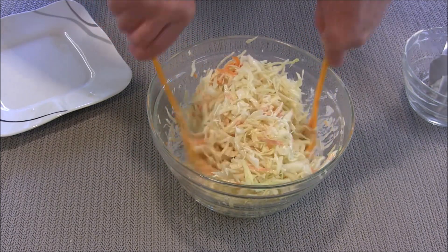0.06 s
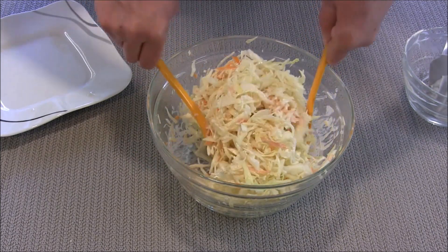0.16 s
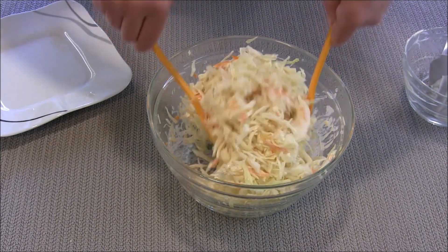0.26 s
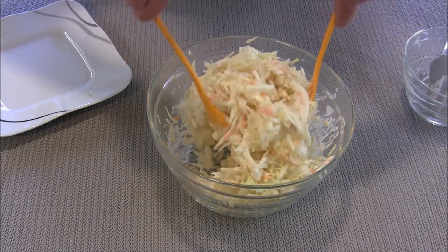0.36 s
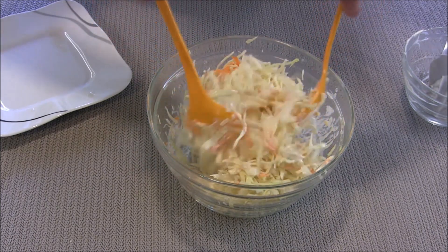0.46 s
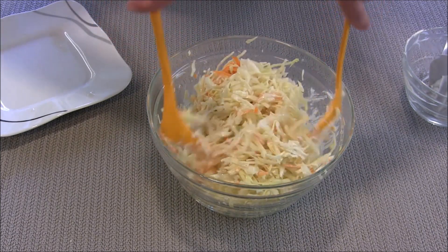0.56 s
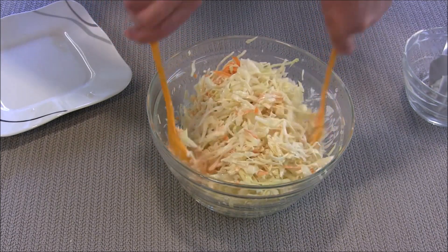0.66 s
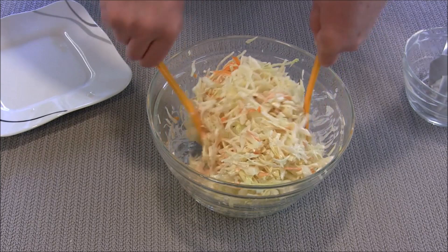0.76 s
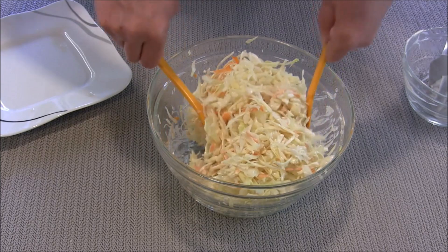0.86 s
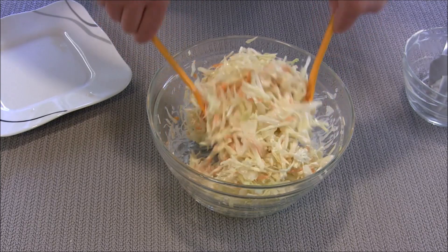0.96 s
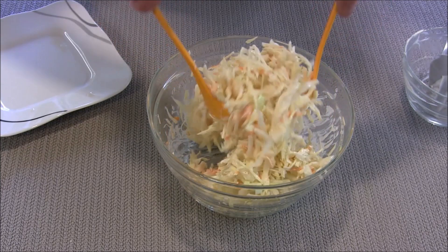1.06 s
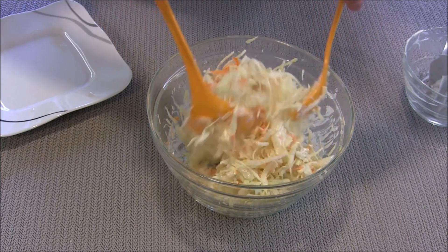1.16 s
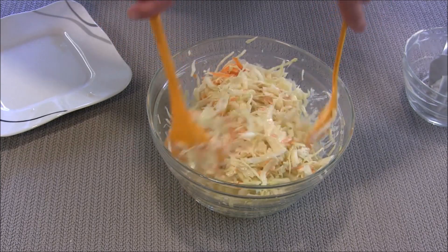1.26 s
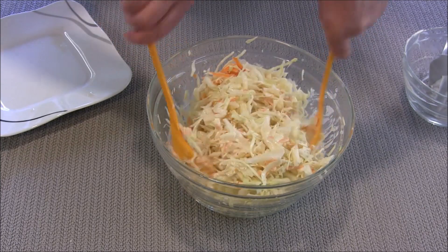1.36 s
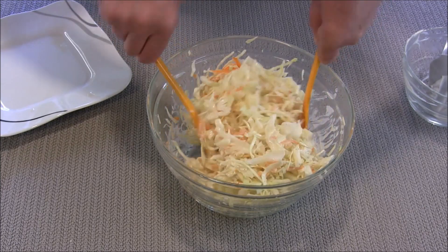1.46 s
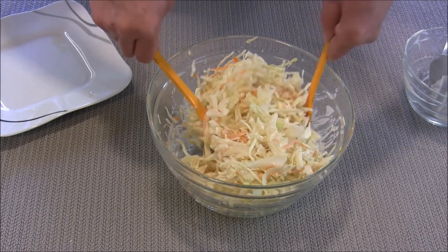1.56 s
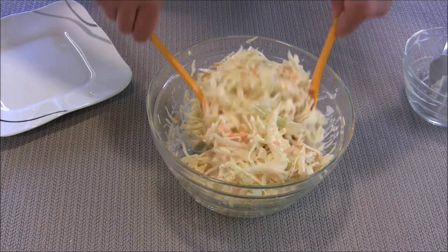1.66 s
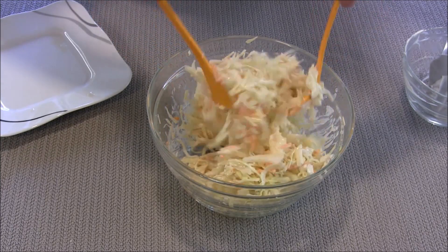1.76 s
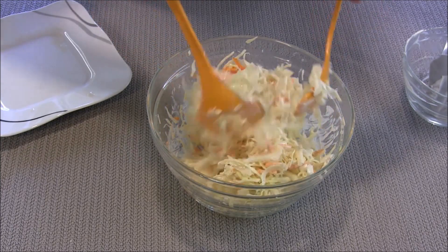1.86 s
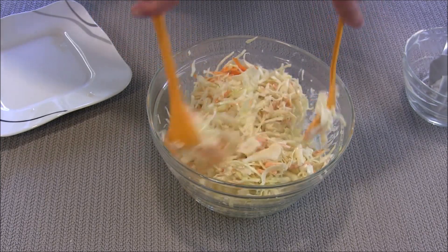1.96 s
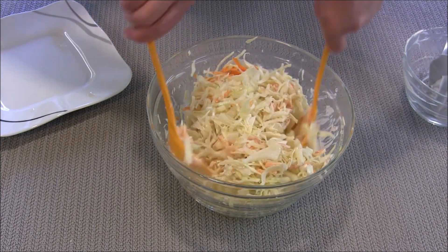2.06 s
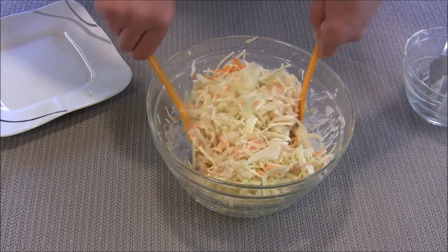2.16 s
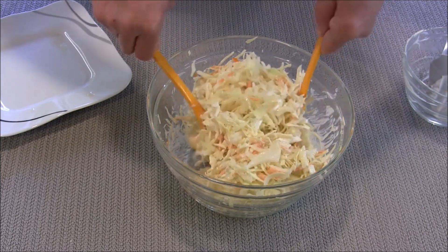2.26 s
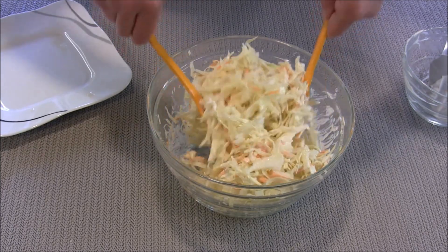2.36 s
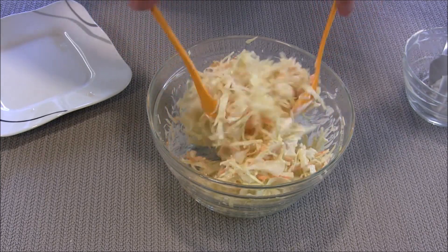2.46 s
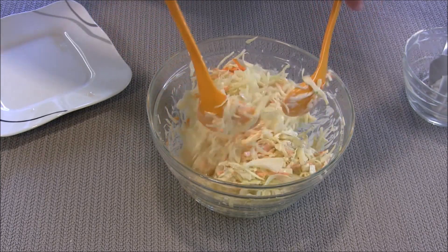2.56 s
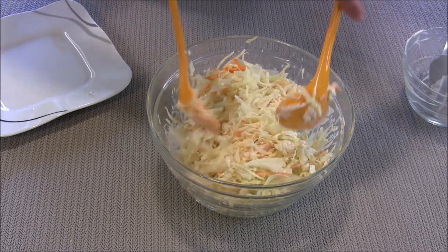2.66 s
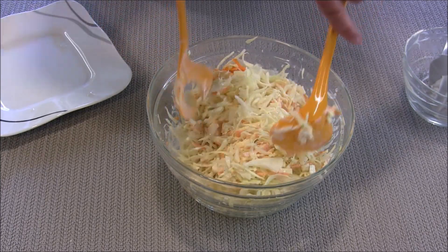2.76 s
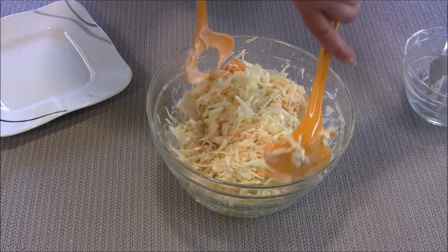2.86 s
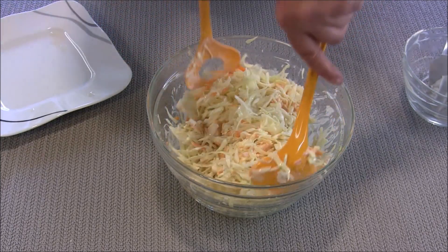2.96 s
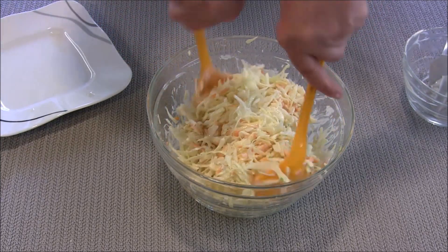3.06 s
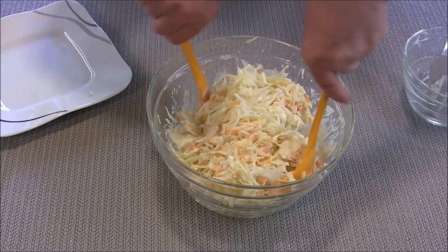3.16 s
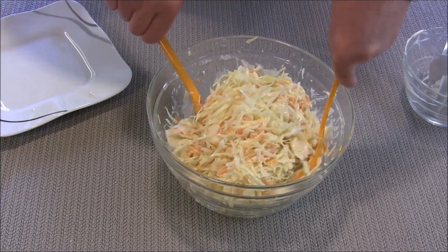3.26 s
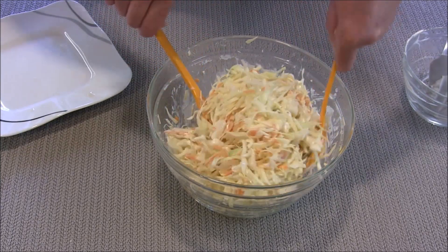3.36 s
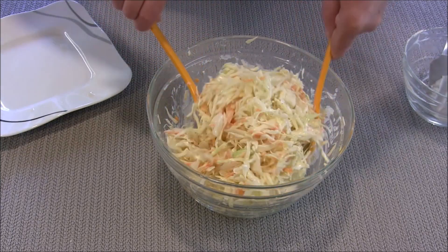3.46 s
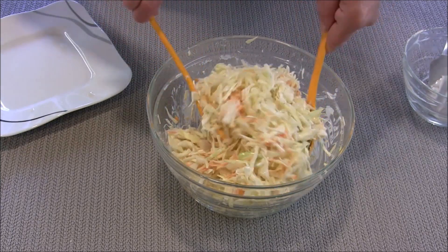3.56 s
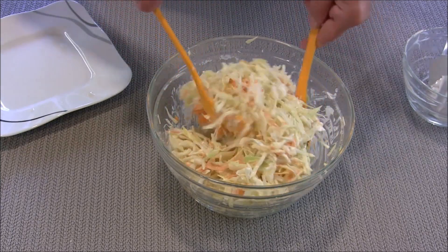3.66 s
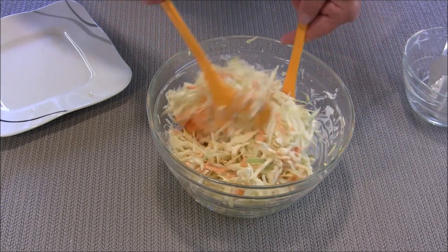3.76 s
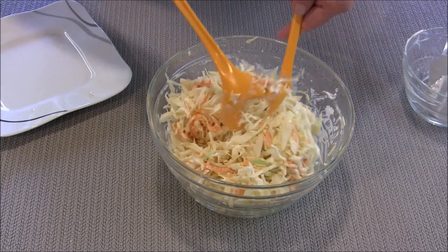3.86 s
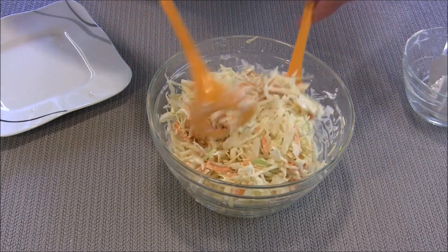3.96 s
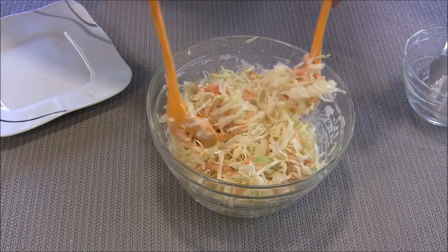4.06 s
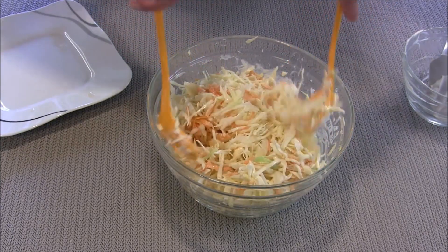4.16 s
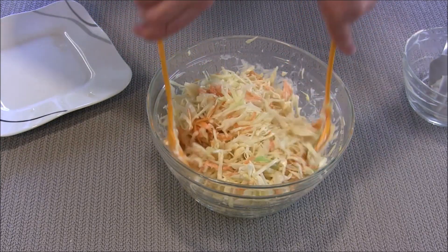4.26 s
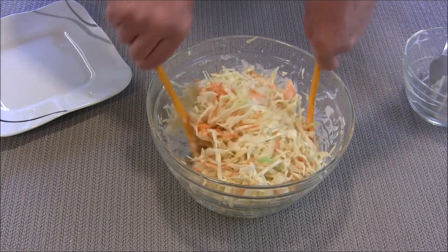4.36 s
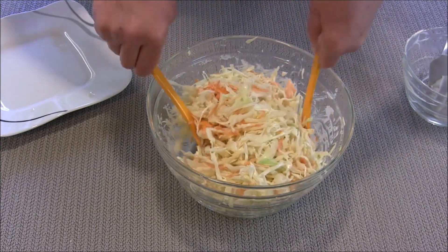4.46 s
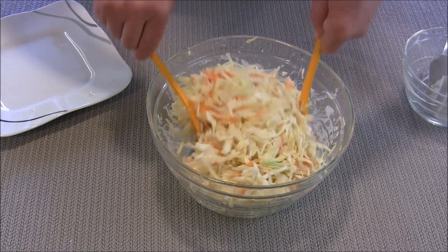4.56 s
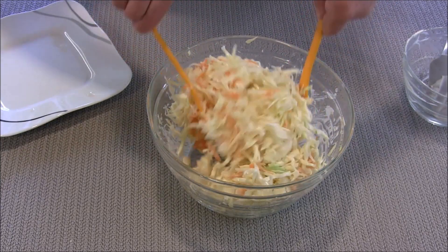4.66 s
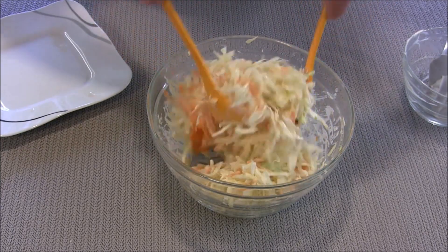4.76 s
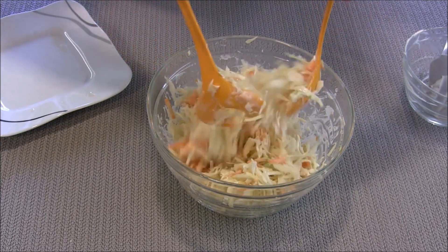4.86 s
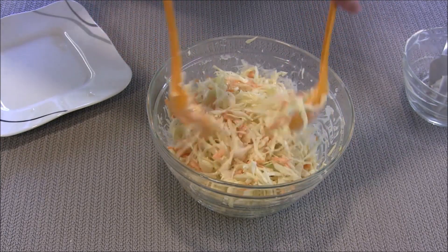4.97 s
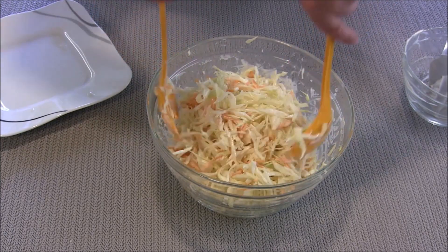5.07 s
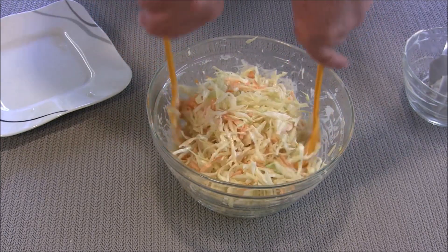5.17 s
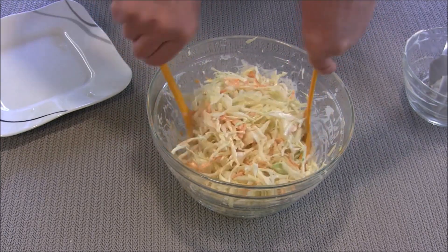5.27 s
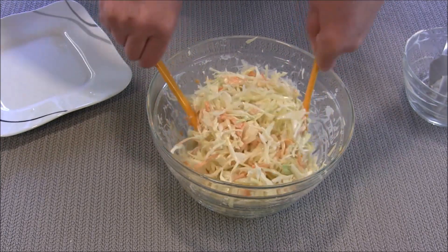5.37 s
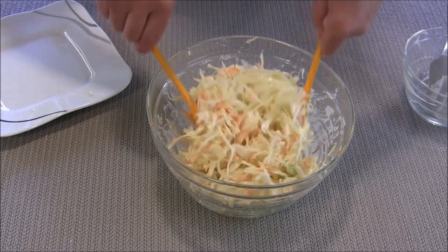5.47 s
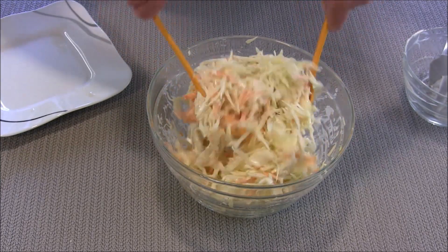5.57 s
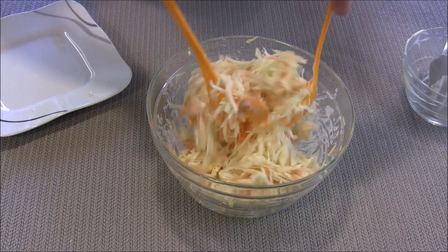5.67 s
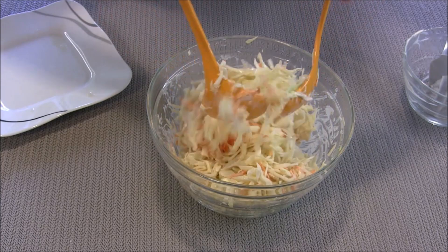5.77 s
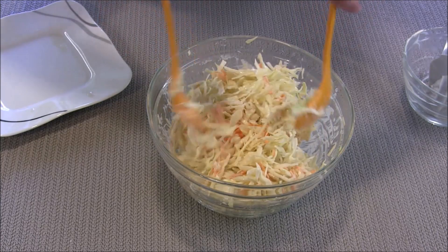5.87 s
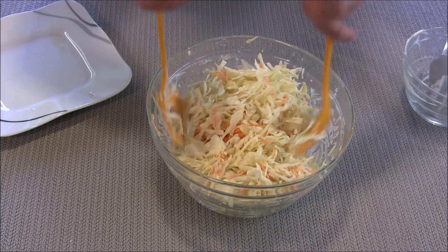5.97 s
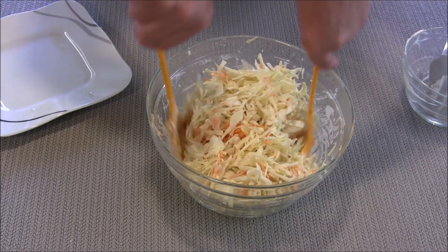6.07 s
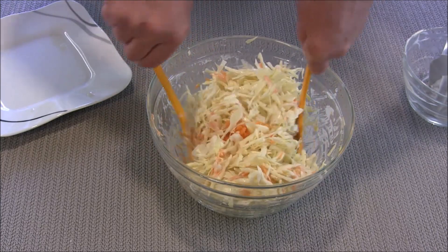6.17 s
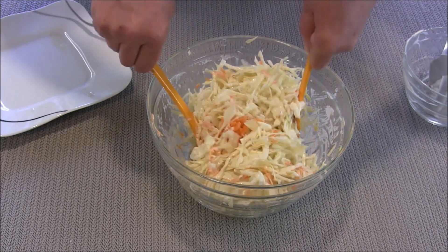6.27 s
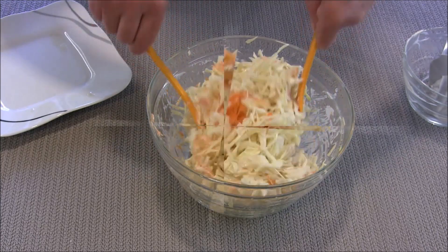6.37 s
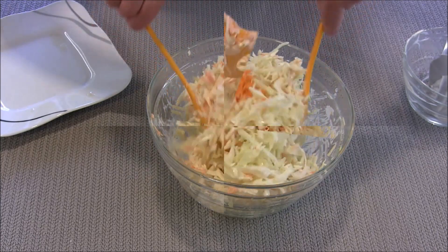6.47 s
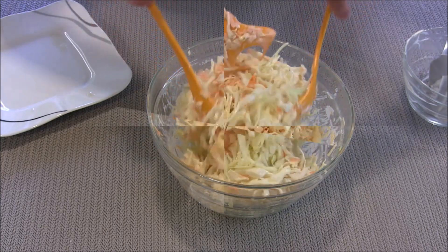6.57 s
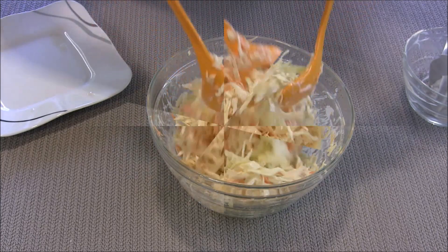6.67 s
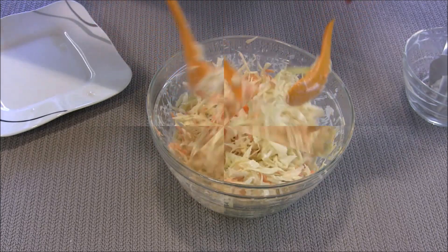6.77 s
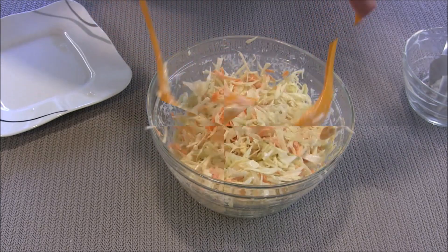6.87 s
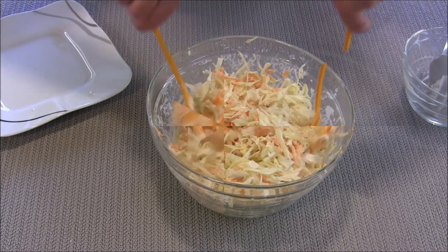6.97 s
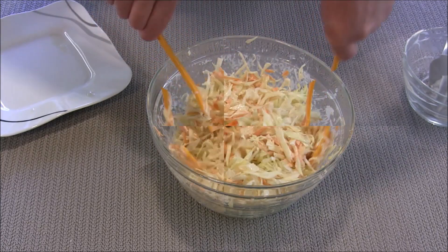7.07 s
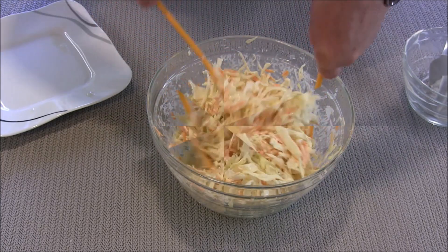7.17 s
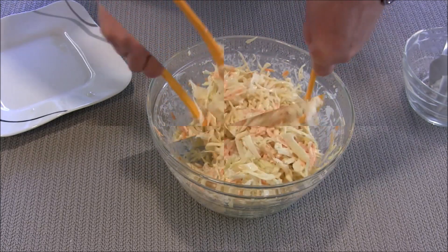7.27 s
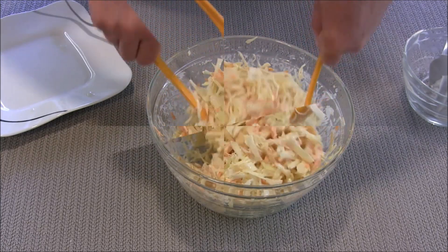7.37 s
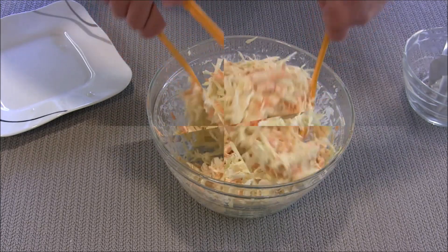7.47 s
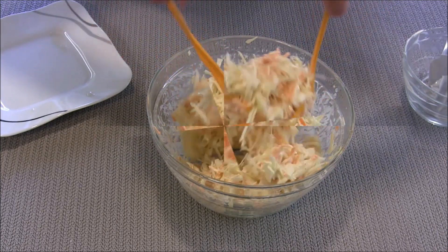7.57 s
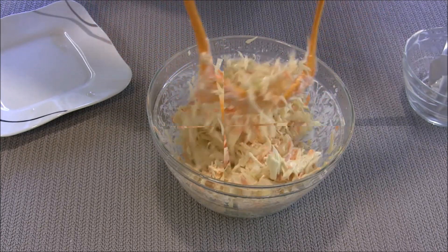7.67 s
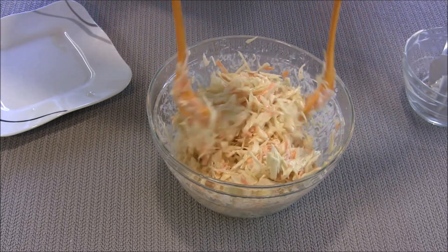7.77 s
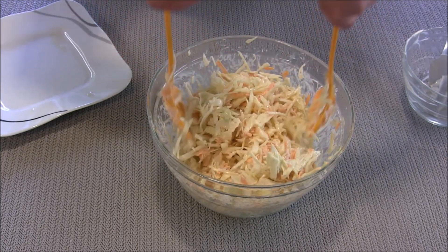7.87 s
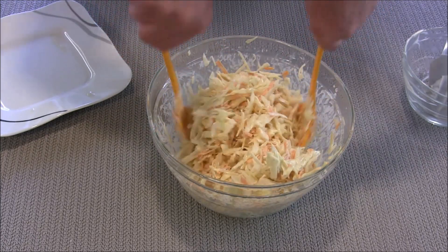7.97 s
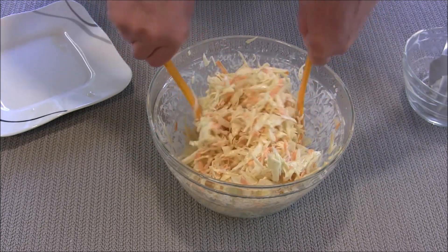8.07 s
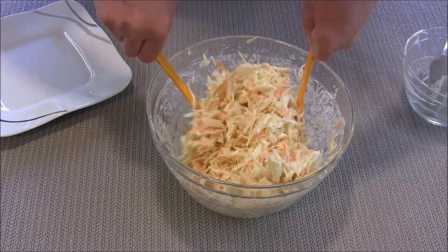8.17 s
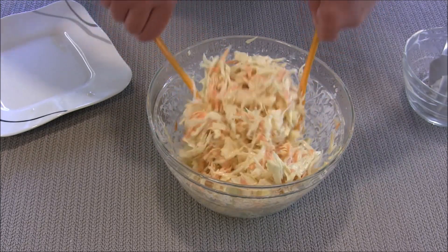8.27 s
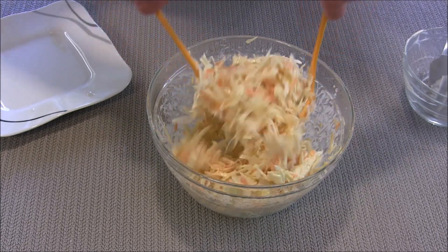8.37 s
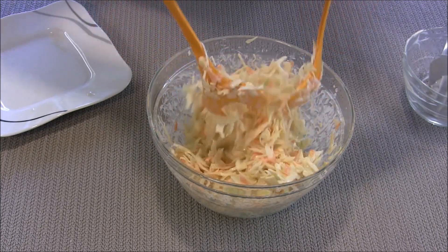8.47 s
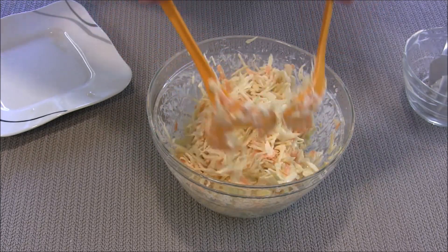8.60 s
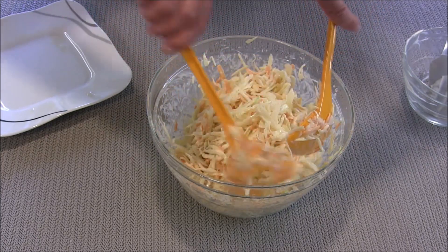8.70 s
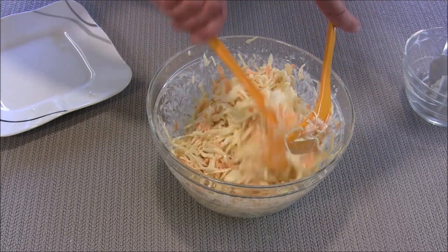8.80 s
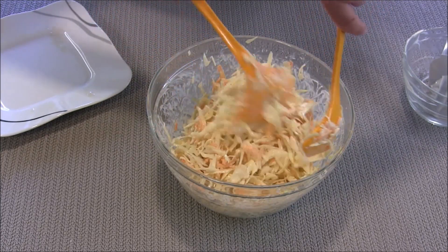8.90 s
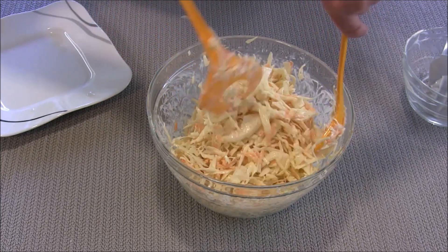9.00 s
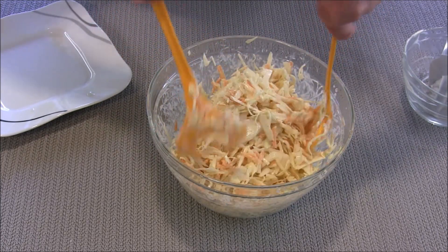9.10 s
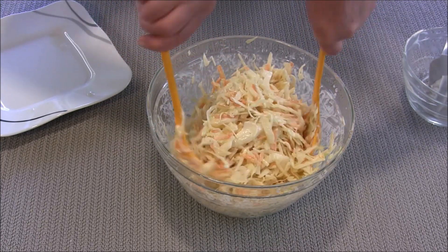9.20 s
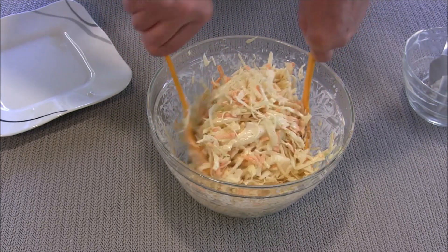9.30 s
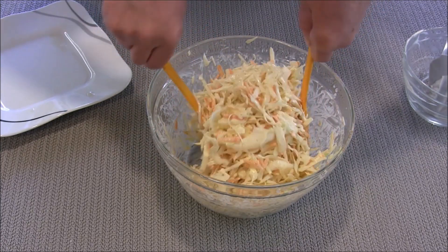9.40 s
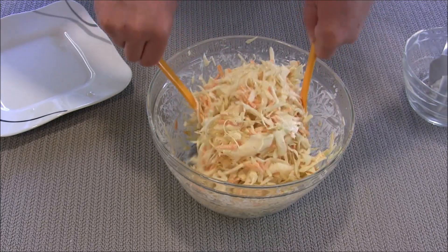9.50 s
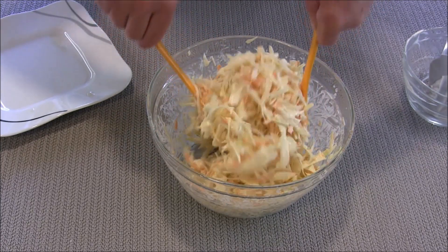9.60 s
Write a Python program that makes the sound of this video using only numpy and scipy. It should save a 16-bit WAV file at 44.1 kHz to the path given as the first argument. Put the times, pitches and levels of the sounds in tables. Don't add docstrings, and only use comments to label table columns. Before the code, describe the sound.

A close stereo microphone in a small, hard kitchen catches plastic servers tossing shredded cabbage in a glass bowl, over faint steady hiss. A clear plastic clack with a rustle comes at 0.2 s. Bright glass knocks follow at 0.7, 1.4 and 2.1 s, ringing only a fraction of a second, roughened by salad, with quick rebounds and lower bumps. A flat slap lands at 3.0 s, a light clack at 3.2, a harder slap at 4.3. The loudest plastic clack cracks at 4.5 s and bounces, with a table thud and rustle; the strongest glass knock rings at 5.2. From 5.5 to 6.9 s it is quieter: faint taps, ticking shreds, soft rustling. A damped knock comes at 7.0, a dull clack at 7.7, a freer ringing blow with rebound at 8.0, a clear clack at 8.9, and a last knock at 9.3 before small rustles and snaps.

```python
import sys
import numpy as np
from scipy import signal
from scipy.fft import rfft, irfft
from scipy.io import wavfile

SR = 44100
rng = np.random.default_rng(int(sys.argv[2]) if len(sys.argv) > 2 else 0)


def unload_wav(signal):
    wavfile.write(
        sys.argv[1],
        SR,
        np.round(np.clip(np.atleast_2d(signal).T, -1, 1) * 32767).astype(np.int16),
    )


def linear_from_db(decibels):
    return 10 ** (np.asarray(decibels, float) / 20)


N = 425124

# [f/Hz, level/dB]
HISS_COLOUR = [(15, -44), (103, -18), (187, -15), (368, -10), (1510, -16), (1930, -16), (11900, -28.5),
               (16500, -30)]

# [t/s, level/dB, lowest mode against it/dB, third mode against it/dB, ring length/share of normal]
# and the ring is short where salad stays on the glass.
KNOCKS = [
    (0.7103, -20.5, -10, -4.5, 0.99),
    (1.4267, -24, -9, -2, 0.54),
    (2.1261, -23.5, -10.5, -8, 1),
    (5.2071, -14.5, -11.5, -6, 0.84),
    (6.1858, -49.5, -20, -5, 0.45),
    (9.2564, -25.5, -22, -6.5, 0.79),
]
SLAPS = [
    (3.041, -19, -18.5, -5.5, 0.74),
    (4.2887, -16.5, -22.5, -0.8, 1),
]
BELLIES = [
    (6.988, -32.5, -7.5, 3, 0.42),
    (7.9588, -21.5, -11.5, -12, 1),
]
REBOUNDS = [
    (1.4496, -33.5, -1.5, 4.5, 0.44),
    (2.1535, -28.5, -10.5, -2.5, 0.65),
    (3.062, -31, -18.5, -16, 0.36),
    (5.2649, -38, 2.5, -3, 1),
    (7.9828, -25.5, -16, -6, 0.94),
]
BUMPS = [(0.0772, -49.5, 1, -4.5, 1), (0.1146, -48.5, -8, 10.5, 0.44), (0.2818, -36.5, -34, 1, 0.3),
         (0.7956, -26.5, -9.5, -8, 0.41), (0.9353, -30.5, -10, -27, 0.34),
         (1.6322, -32.5, -16.5, 0.5, 0.34), (2.3181, -34.5, -37, -12, 0.22), (3.1284, -45, -7.5, -40, 0.9),
         (3.4221, -35, -16, -1, 0.58), (3.4444, -56, 6.5, 22, 0.22), (4.596, -43, -12, 4, 0.47),
         (7.0349, -38.5, -1.5, -8, 0.48), (9.189, -43.5, -7, 7, 0.42)]
TOUCHES = [
    (3.3184, -61.5, -19, 7, 1.2),
    (6.0994, -76.5, 24, 4, 2),
    (6.1404, -52.5, -7, -.6, 0.64),
    (6.7544, -61, -5, -1, 1.9),
    (6.9344, -67.5, 7, 8, 1.9),
    (7.1586, -55, 12.5, -5, 1.02),
    (8.1844, -57.5, -30, -6, 0.55),
]

# [mode two/dB, four/dB, five/dB, six/dB, crack/dB, sharp tap/dB, blunt skid/dB]
KNOCK_STIRS = (-11, -10, 3.9, 3.1, 12.5, -0.3, -18)
SLAP_STIRS = (-16.5, -12.5, 6.5, 0, 11.5, -4.3, -17)
BELLY_STIRS = (-11, -2, 6.5, 1, 13.5, -7.5, -9.5)
REBOUND_STIRS = (-5.5, -8, -2.5, -7.5, 11.5, -1.5, -5)
BUMP_STIRS = (-4, -2, 5.5, -3.5, 8.5, -3, -6.5)
TOUCH_STIRS = (2.3, -15, -31, -36, -4, -17, 2)

# [f/Hz, f of the twin/Hz]
RIM = [(655.5, 657.5), (1496, 1507), (2617, 2627), (3992, 4008), (5630, 5700), (7512, 7545), (9555, 9620)]
RIM_T60 = [0.29, 0.16, 0.18, 0.12, 0.041, 0.046, 0.023]
RIM_RISE = [0.0053, 0.0021, 0.0064, .002, 0.0011, 0.00069, 0.0014]
RIM_ROUGH = [0.12, 0.38, .35, .4, 0.93, 0.83, .8]
# [f/Hz, level/dB, t60/s]
WALL = [(5100, -14, .06), (6024, -10, .08), (6420, -12, .06), (7865, -14, .07), (11830, -21, .06),
        (12450, -21, .05), (13670, -19, .07), (14225, -20, .06)]

# [t/s, level near 330 Hz/dB, level near 150 Hz/dB, level near 700 Hz/dB]
THUDS = [(0.121, -55, -56, -43.5), (0.192, -31.5, -43.5, -37), (0.215, -53, -48, -45),
         (0.807, -53, -50, -64.5), (0.853, -41.5, -50, -56), (0.942, -39.5, -52, -56),
         (1.431, -45, -59, -84.5), (1.534, -48.5, -47, -71), (1.633, -47, -57, -69), (2.132, -48, -57, -47),
         (2.26, -52.5, -53, -68), (2.674, -68, -67, -64), (3.195, -54, -74, -55), (3.202, -40.5, -72, -50),
         (3.241, -38.5, -45.5, -51), (3.424, -51, -60, -66), (4.294, -43.5, -58.5, -43.5),
         (4.469, -27.5, -36, -39), (4.503, -32, -40.5, -35), (5.216, -44, -57, -64.5),
         (5.399, -52, -52, -59), (6.231, -49, -47.5, -69), (7.25, -49.5, -46.5, -52.5),
         (7.962, -42.5, -50, -59), (9.259, -49, -64, -46), (9.358, -54, -55, -71)]
# [f/Hz, level/dB]
TABLE_MODES = [(150, -3), (255, -6), (317, 0), (350, -1), (385, -8)]
TABLE_T60 = [.18, .11, .18, .17, .09]

# [t/s, level/dB, centre f/Hz]
TICKS = [(0.169, -49, 4470), (1.5774, -56, 5630), (2.5094, -59, 5030), (2.543, -45, 4500),
         (2.5694, -64, 4720), (2.7097, -46.5, 5960), (2.807, -46, 6260), (2.8808, -41.5, 13200),
         (3.039, -37, 5200), (3.3973, -39, 5670), (3.65, -56, 6110), (3.8017, -44.5, 4680),
         (5.396, -38, 8900), (6.2577, -50, 4600), (6.3025, -52, 5000), (6.3575, -45, 4600),
         (6.648, -54, 5250), (6.789, -44.5, 5620), (6.919, -46, 11500), (7.6818, -44.5, 7420),
         (7.7397, -49, 4890), (8.133, -37, 5530), (8.205, -41, 4710), (8.217, -55, 5240),
         (8.335, -56, 5690), (8.519, -50, 8430), (9.0694, -59, 5110), (9.4694, -52.5, 5110),
         (9.5307, -59, 5700), (9.6, -49, 4720)]
# [peak t/s, rustle level/dB, scrape level/dB, length/s]
TOSSES = [(0.195, -38.5, -48, 0.13), (0.85, -49, -51, 0.23), (1.572, -48, -60, .25),
          (2.306, -47.5, -55, 0.17), (2.741, -65.5, -67, 0.4), (3.24, -40, -54, 0.18),
          (3.75, -63.5, -71.5, 0.87), (4.514, -37, -52.5, 0.11), (4.895, -63.5, -72, 0.36),
          (5.391, -50.5, -52, 0.17), (6.6, -58.5, -62, 1), (7.191, -48, -57.5, 0.38),
          (8.133, -60, -61.5, 0.66), (9.368, -49, -62, 0.18)]

# [t/s, crack level/dB, spoon hollow level/dB, spoon edge level/dB, hollow f/Hz]
CLACKS = [
    (0.1987, -16, -29, -18.5, 3270),
    (1.5308, -45, -41, -36.5, 3570),
    (3.2482, -33, -50, -35.5, 2960),
    (4.4665, -3, -21.5, -7, 2970),
    (4.5025, -16, -17.5, -13, 3340),
    (6.2428, -48, -51.5, -43.5, 2967),
    (7.2446, -45, -57, -50, 3000),
    (7.275, -37, -39.5, -39, 3310),
    (7.7217, -30.5, -30, -23, 2670),
    (8.8634, -22, -32.5, -21, 2920),
]

# [f/Hz, t60/s, level/dB, side minus mid level/dB]
ROOM = [(200, 0.26, 4.5, -13.5), (880, 0.38, -1.5, -11.5), (2640, 0.35, -0.5, -27.5), (5556, 0.28, -3, -7),
        (12000, 0.13, -4, -5)]

FLIGHT_S = .0012
LOAD_S = 0.0062
HANDLE_DB = -8.5
RISE_DB, FALL_DB = 21, 16.5
SCRAPE_LEAD_S, SCRAPE_SPREAD = .03, 1
SETTLE_DB, REST_DB = -68.5, -78.5
HISS_DB = -57.5
EARLY_S, EARLY_SIDE_DB = .0015, -22
OFFSET = -.0005
LEFT_RIGHT = np.array([[1], [-1]])


def band(x, lo_hz, hi_hz):
    sos = signal.butter(2, [lo_hz, min(hi_hz, .45 * SR)], "band", fs=SR, output="sos")
    return signal.sosfilt(sos, x)


def unit(x):
    return x / np.sqrt(np.mean(x ** 2))


def train(s, size):
    at = ((np.asarray(s) + FLIGHT_S) * SR).astype(int)
    return np.bincount(at, size, N)


def ring(x, hz, t60):
    turn = np.exp(2j * np.pi * hz / SR - np.log(1000) / (t60 * SR))
    return signal.lfilter([1], [1, -turn], x)


def bursts(s, db, fade_s, lo_hz, hi_hz):
    fade = signal.lfilter([1], [1, -np.exp(-1 / (fade_s * SR))], train(s, linear_from_db(db)))
    noise = fade * rng.standard_normal(N)
    return band(noise, lo_hz, hi_hz) * np.sqrt(SR / 2 / (hi_hz - lo_hz))


def wandering(rate):
    steps = rng.standard_normal((2, 1000))
    at = np.arange(N) * rate / SR
    real, imag = (np.interp(at, np.arange(1000), walk) for walk in steps)
    return real + 1j * imag


def hiss():
    hz, db = np.transpose(HISS_COLOUR)
    shape = linear_from_db(np.interp(np.log(np.fft.rfftfreq(N, 1 / SR) + 1), np.log(hz), db))
    mid, side = (unit(irfft(rfft(rng.standard_normal(N)) * shape, N)) for _ in range(2))
    return linear_from_db(HISS_DB - 5.5) * (mid + linear_from_db(-3.5) * side * LEFT_RIGHT)


def contacts():
    kinds = [(KNOCKS, KNOCK_STIRS), (SLAPS, SLAP_STIRS), (BELLIES, BELLY_STIRS),
             (REBOUNDS, REBOUND_STIRS), (BUMPS, BUMP_STIRS), (TOUCHES, TOUCH_STIRS)]
    rows = []
    for hits, stirs in kinds:
        for s, db, one_db, three_db, free in hits:
            rows.append((s, free, db + one_db, db + three_db, *(db + np.array(stirs))))
    return np.transpose(sorted(rows))


def bowl():
    s, free, one_db, three_db, two_db, four_db, five_db, six_db, crack_db, tap_db, skid_db = contacts()
    rim_db = [one_db, two_db, three_db, four_db, five_db, six_db, six_db - 10.0]
    place = rng.uniform(0, 2 * np.pi, (len(s), len(RIM) + len(WALL))).T
    t = np.arange(SR // 3) / SR
    at = ((s + FLIGHT_S) * SR).astype(int)[:, None] + np.arange(len(t))
    loss = np.log(1000) * t / np.clip(free, .3, 2)[:, None]
    wander = wandering(90)
    glass = 0
    for k, db in enumerate(rim_db):
        twins = np.exp(2j * np.pi * np.outer(RIM[k], t))
        pair = np.outer(abs(np.cos(place[k])), twins[0]) + np.outer(abs(np.sin(place[k])), twins[1])
        fade = linear_from_db(db + 6)[:, None] * np.exp(-loss / RIM_T60[k])
        fade = fade * (1 - np.exp(-t / RIM_RISE[k]))
        salad = np.roll(wander, 9000 * k)[np.minimum(at, N - 1)]
        load = 1 + RIM_ROUGH[k] * (1 - np.exp(-t / LOAD_S)) * salad
        glass = glass + (pair * load).imag * fade
    glass = np.bincount(at.ravel(), glass.ravel(), N)[:N]
    for (hz, db, t60), angle in zip(WALL, place[len(RIM):]):
        glass = glass + ring(train(s, linear_from_db(five_db + db) * np.cos(angle)), hz, t60).imag

    click = ring(train(s, linear_from_db(tap_db + 18)), 6800, 0.0021).imag
    click = click + bursts(s, crack_db - 3, 0.0012, 8000, 14500)
    skid = bursts(s, skid_db + 5.0, 0.012, 800, 7900)
    skid = skid + bursts(s, tap_db + 1.5, 0.0066, 3100, 8000)
    skid = skid + bursts(s, crack_db - 19.5, 0.013, 8200, 15000)
    smear = bursts(s, skid_db, 0.022, 2500, 2734) + bursts(s, three_db - 19.5, 0.0046, 2700, 2850)
    return signal.lfilter(*signal.iirnotch(10800, 8, SR), glass + click + skid + smear)


def table():
    s, mid_db, low_db, high_db = np.transpose(THUDS)
    wood = bursts(s, high_db - 1.5, 0.027, 630, 830)
    wood = wood + bursts(s, low_db - 8.0, .03, 120, 160)
    wood = wood + bursts(s, mid_db - 8, .025, 210, 420)
    for (hz, db), t60 in zip(TABLE_MODES, TABLE_T60):
        push_db = low_db if hz < 200 else mid_db
        size = linear_from_db(push_db + db) * rng.uniform(0.66, 1, len(s)) * rng.choice([-1, 1], len(s))
        wood = wood + ring(train(s, size), hz, t60).imag
    rumble = bursts(s, low_db - 25.5, 0.056, 22, 80)
    return band(wood, 76.4, 1500) + rumble


def lifts(s, db, length_s, rest_db):
    t = np.arange(0, N, 64) / SR
    late = (t - s[:, None]) / np.maximum(length_s, .03)[:, None]
    swell_db = np.where(late < 0, RISE_DB * late, -FALL_DB * late)
    gain = linear_from_db(db[:, None] + swell_db).sum(axis=0) + linear_from_db(rest_db)
    return np.repeat(gain, 64)[:N]


def shreds():
    snaps = np.zeros(N)
    t = np.arange(300) / SR
    for (s, db, hz), noise in zip(TICKS, rng.standard_normal((len(TICKS), len(t)))):
        snap = band(noise * np.exp(-t / .0012), hz / 1.6, hz * 1.7)
        snaps[int(s * SR):][:len(t)] += linear_from_db(db + 3) * snap

    s, rustle_db, scrape_db, length_s = np.transpose(TOSSES)
    grains = (rng.random(N) < 3000 / SR) * linear_from_db(np.minimum(2.5 * rng.exponential(size=N), 9))
    grains = grains * rng.standard_normal(N)
    rustle = unit(band(grains, 1100, 6700)) * lifts(s, rustle_db, length_s, SETTLE_DB) * linear_from_db(-9)

    patchy = linear_from_db(4 * wandering(45).real)
    scrape_gain = lifts(s - SCRAPE_LEAD_S, scrape_db, length_s * SCRAPE_SPREAD, REST_DB)
    drag = unit(rng.standard_normal(N) * patchy) * scrape_gain * linear_from_db(-6.0)
    stirred = sum(ring(drag, hz, t60).imag for (hz, _), t60 in zip(RIM[:4], RIM_T60)) * linear_from_db(-31)
    scrape = band(drag, 170, 520) * linear_from_db(15)
    hum = ring(drag, 345, 0.35).imag * linear_from_db(-29.5)
    return snaps + rustle + stirred + scrape + hum


def servers():
    out = np.zeros((2, N))
    t = np.arange(3000) / SR
    crack_fade = np.exp(-t / 0.00059) + linear_from_db(-20.5) * np.exp(-t / 0.0119)
    chatter_fade = 0.77 * np.exp(-t / 0.0016) + linear_from_db(-15.0) * np.exp(-t / 0.0164)
    noises = rng.standard_normal((len(CLACKS), len(t)))
    for (s, crack_db, hollow_db, edge_db, hollow_hz), noise in zip(CLACKS, noises):
        chatter = 4.5 * (t == 0) + noise * chatter_fade
        crack = linear_from_db(crack_db + 7) * band(noise * crack_fade, 7500, 19000)
        handle = linear_from_db(hollow_db + HANDLE_DB + 12.5) * band(chatter, 1000, 3870)
        hollow = linear_from_db(hollow_db + 16) * band(chatter, hollow_hz / 1.2, hollow_hz * 1.22)
        edge = linear_from_db(edge_db + 11) * band(chatter, 4500, 6440)
        out[:, int((s + FLIGHT_S) * SR):][:, :len(t)] += crack + handle + hollow + edge
    return out


def early(x):
    t = np.arange(400) / SR
    scatter = rng.standard_normal(len(t)) * np.exp(-t / EARLY_S)
    scatter = scatter / np.sqrt(np.sum(scatter ** 2))
    return linear_from_db(EARLY_SIDE_DB) * signal.fftconvolve(x.mean(axis=0), scatter)[:N] * LEFT_RIGHT


def kitchen(x):
    t = np.arange(SR // 2) / SR
    rise = np.clip((t - .002) / 0.0066, 0, 1)
    echo = 0
    for hz, t60, db, side_db in ROOM:
        mid, side = (unit(band(rng.standard_normal(len(t)), hz / 2.24, hz * 1.894)) for _ in range(2))
        spread = mid + linear_from_db(side_db) * side * LEFT_RIGHT
        echo = echo + linear_from_db(db - 60 * t / t60) * spread * np.sqrt(40 * hz) / SR
    return signal.fftconvolve(x.mean(axis=0)[None], echo * rise, axes=1)[:, :N]


def scene():
    high_pass = signal.butter(2, 350, "high", fs=SR, output="sos")
    glass = signal.sosfilt(high_pass, bowl())
    near = (glass + table() + shreds() + servers()) * linear_from_db(np.array([[.3], [-.3]]))
    return hiss() + near + early(near) + kitchen(near)


def band_limit(x):
    return signal.sosfilt(signal.butter(12, 16990, fs=SR, output="sos"), x)


def record(dry):
    keep = np.exp(-1 / (0.01 * SR))
    power = signal.lfilter([1 - keep], [1, -keep], np.mean(dry ** 2, axis=0))
    held = dry * (1 + power / linear_from_db(-21.5) ** 2) ** -.15
    rounded = np.tanh(1.3 * held) / 1.3
    cut = signal.sosfilt(signal.ellip(8, .3, 60, 15900, fs=SR, output="sos"), rounded)
    return band_limit(cut + OFFSET)


dry = scene()
out = record(dry)
unload_wav(out)
```